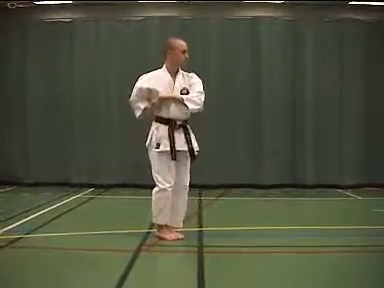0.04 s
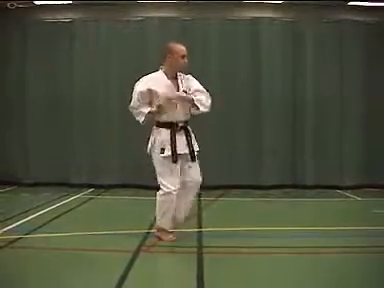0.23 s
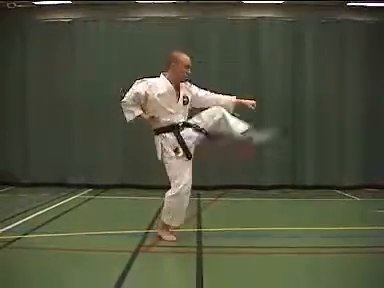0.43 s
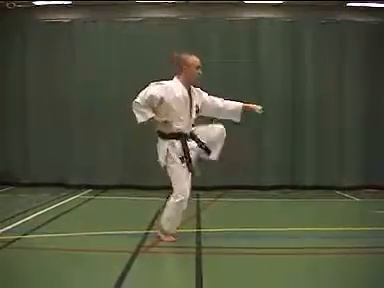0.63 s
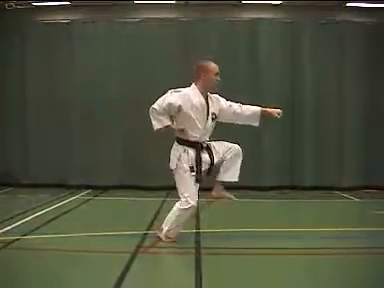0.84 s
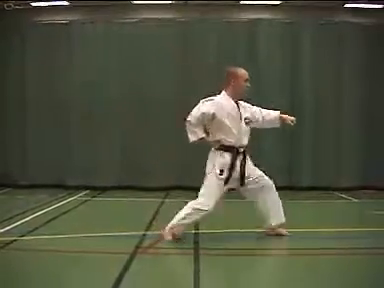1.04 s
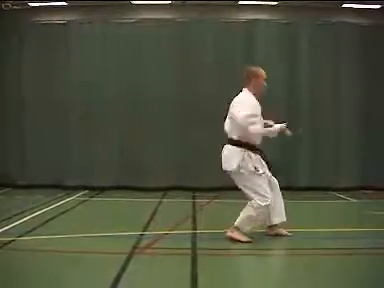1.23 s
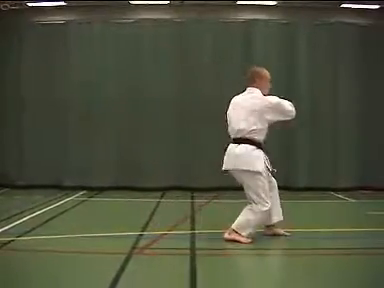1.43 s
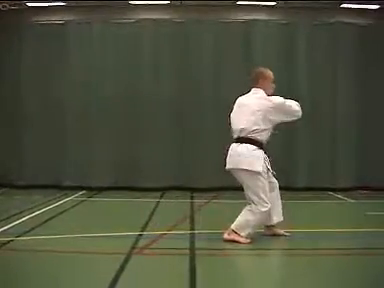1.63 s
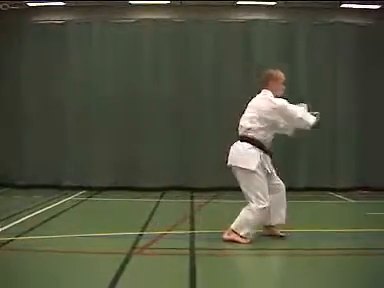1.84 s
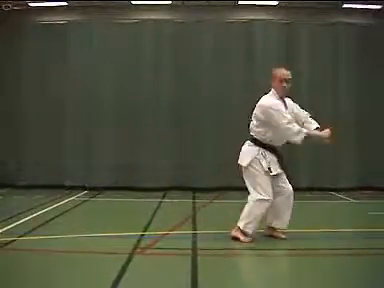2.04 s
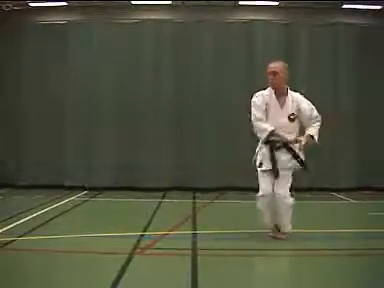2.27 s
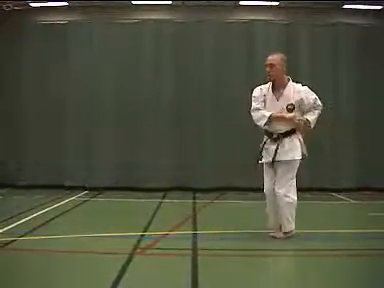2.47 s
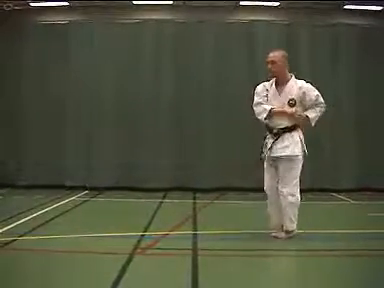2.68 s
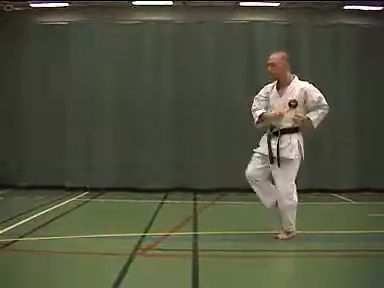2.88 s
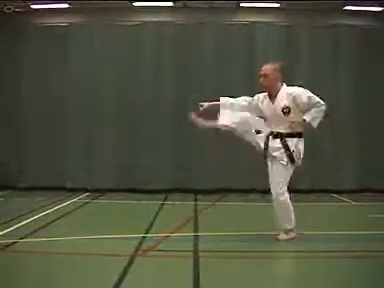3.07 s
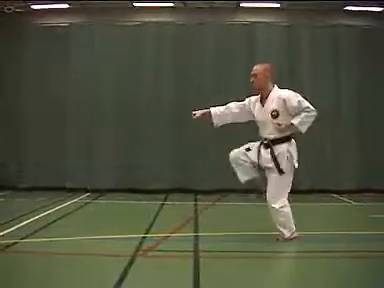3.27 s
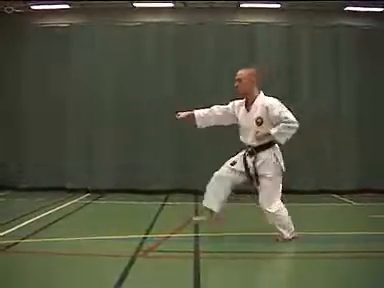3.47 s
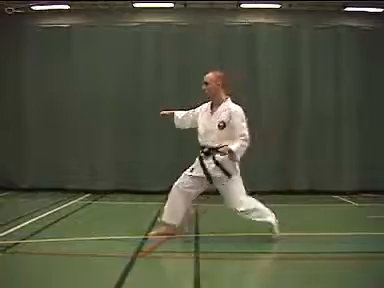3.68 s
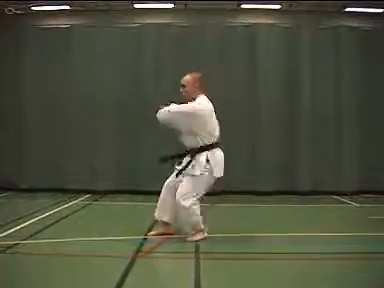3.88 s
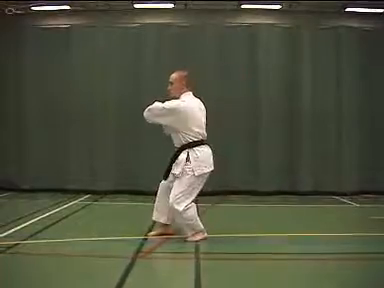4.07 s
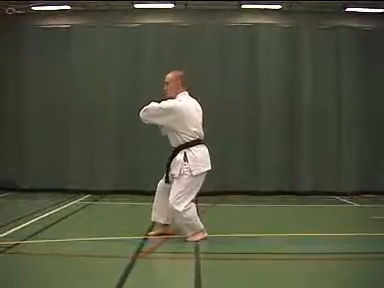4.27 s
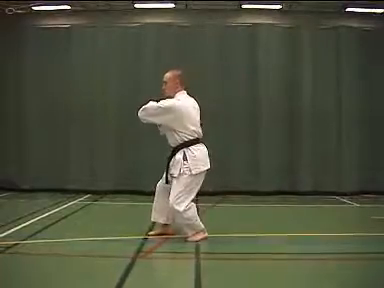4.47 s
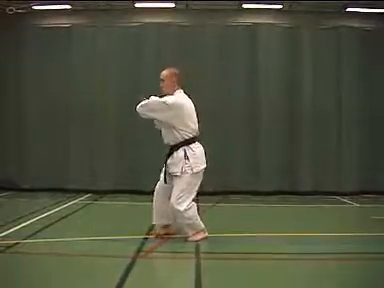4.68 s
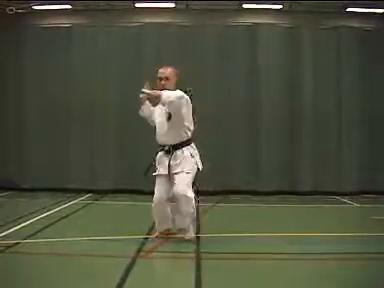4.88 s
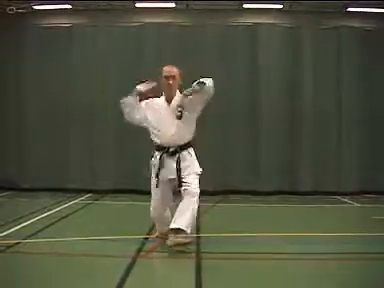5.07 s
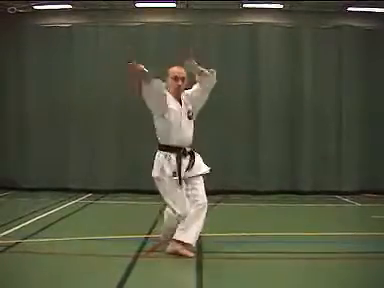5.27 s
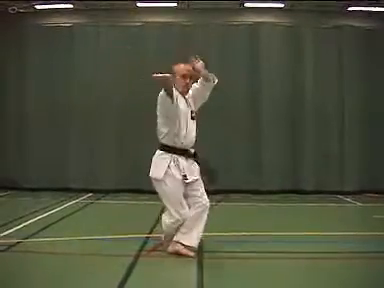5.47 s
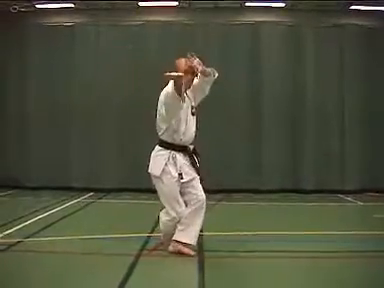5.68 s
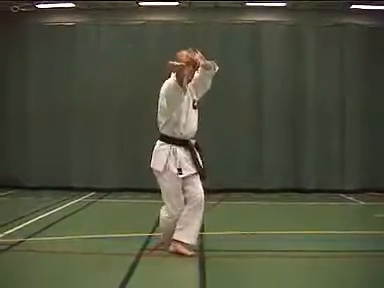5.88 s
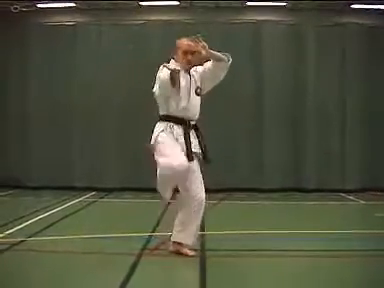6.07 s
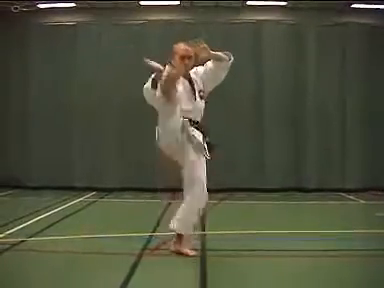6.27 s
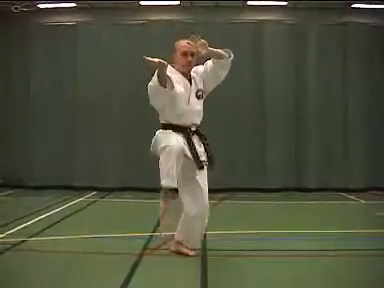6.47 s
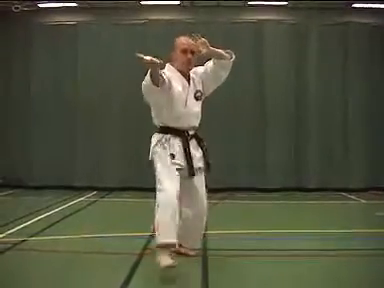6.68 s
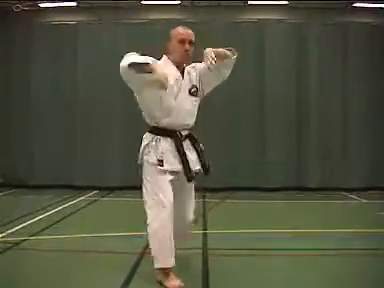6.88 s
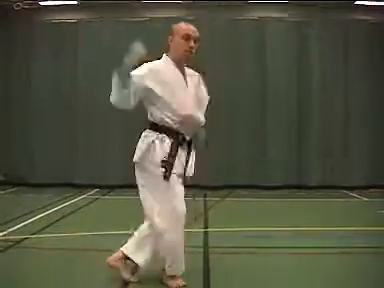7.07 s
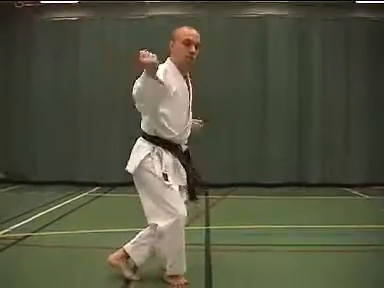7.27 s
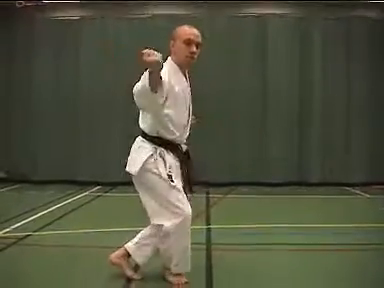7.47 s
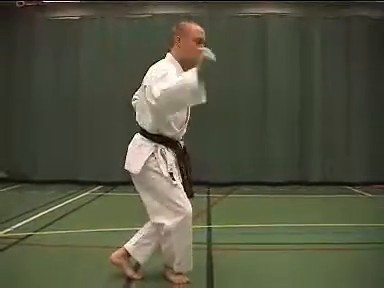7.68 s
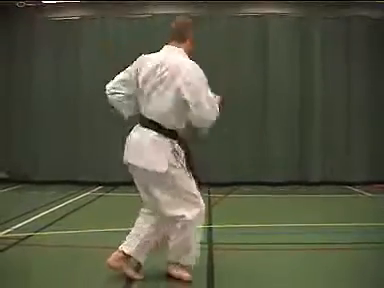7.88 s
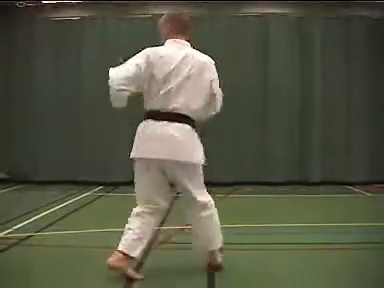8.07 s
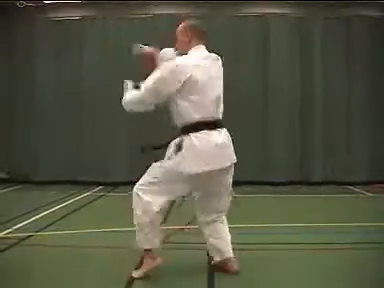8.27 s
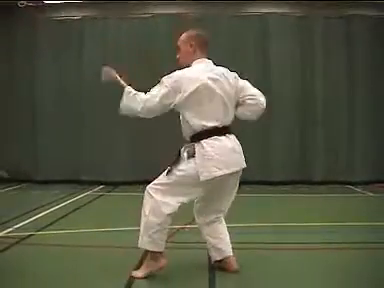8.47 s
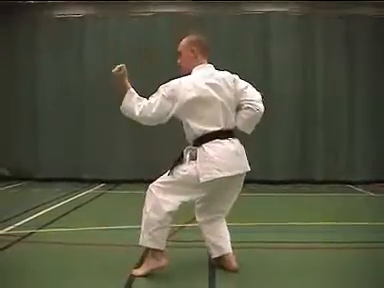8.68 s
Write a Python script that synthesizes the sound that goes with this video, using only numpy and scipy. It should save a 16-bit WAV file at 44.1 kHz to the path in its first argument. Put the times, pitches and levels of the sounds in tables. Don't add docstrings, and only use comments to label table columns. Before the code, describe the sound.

A barefoot martial artist moves through a form in a large sports hall. A cloth snap is followed by two hard foot slaps with deep thumps, then a quiet pause. More stamps and snapping sleeves come in uneven bursts, with rustling cotton and sliding soles. The distant microphone catches a long, boomy reverberation over ventilation rumble and a thin mechanical whine.

```python
import sys
import numpy as np
from scipy import signal
from scipy.fft import rfft, irfft, next_fast_len
from scipy.io import wavfile
from scipy.ndimage import uniform_filter1d

SR = 44100
rng = np.random.default_rng(int(sys.argv[2]) if len(sys.argv) > 2 else 0)


def persist_wave(psi):
    counts = np.round(np.clip(psi, -1, 1) * 32767).astype(np.int16)
    wavfile.write(sys.argv[1], SR, np.atleast_2d(counts).T)


N = 384552

# [f/Hz, level/dB]
FIBRE_FIZZ = [(1000, 14), (2500, 8), (4500, 2.5), (9000, -5), (16000, -12.5)]


def gain_of(db):
    return 10 ** (np.asarray(db) / 20)


def evened(x):
    return x / np.sqrt(np.mean(x ** 2) + 1e-20)


def read(points, hz):
    f, value = np.transpose(points)
    return np.interp(np.log(hz + 1), np.log(f + 1), value)


def add(mix, start_s, sound):
    part = mix[round(start_s * SR):][:len(sound)]
    part += sound[:len(part)]


def coloured(x, points):
    fft_size = next_fast_len(len(x))
    gain = gain_of(read(points, np.fft.rfftfreq(fft_size, 1 / SR)))
    return irfft(rfft(x, fft_size) * gain, fft_size)[:len(x)]


def resonate(x, hz, width_hz):
    return signal.lfilter(*signal.iirpeak(min(hz, SR / 3), hz / width_hz, SR), x)


def crack(noise, peak_db, body_hz, treble_db, length_ms, fizz=FIBRE_FIZZ):
    t = np.arange(len(noise)) / SR
    swell = (t * 1000 / max(length_ms, 0.3)) ** 2 * np.exp(-4000 * t / max(length_ms, 0.3))
    pocket = swell * (noise + 1.06 * np.cos(2 * np.pi * body_hz * t))
    click = signal.unit_impulse(len(noise), 100)

    def voiced(body, fibres):
        ring = resonate(resonate(body, body_hz, 2.02 * body_hz), body_hz, 2.8 * body_hz)
        return evened(ring) + gain_of(treble_db) * evened(coloured(fibres, fizz))

    near, far = voiced(pocket, swell * noise), voiced(click, click)
    scale = gain_of(peak_db) / abs(near).max()
    return scale * near, scale * far


def slaps():
    # [t/s, peak/dB, extra treble/(dB/octave), length/ms, hall share/dB]
    sleeve_slaps = [
        (0.5946, -3, -4.5, 2.63, -3),
        (6.4725, -7.5, 1, 9.4, -3.5),
        (7.1112, -3.5, 0, 5, -4),
    ]
    skin_slaps = [
        (1.1225, -3, 1, 5.6, 8.1),
        (1.4344, -1, 0.3, 7.5, 2.5),
    ]
    skid_slaps = [
        (3.7612, -10, -1, 5.5, 5.7),
        (5.256, -11.5, 0.5, 3.2, 5.6),
    ]
    # [f/Hz, density/(dB/Hz)]
    sleeve_colour = [(180, -30), (350, -12), (750, -0.5), (1300, -6.5), (2100, -13), (4650, -21.5),
                     (15500, -39)]
    skin_colour = [(180, -49), (450, -3.5), (800, -4.5), (1180, -1), (2100, -8), (3200, -15), (4600, -16),
                   (15500, -36.5)]
    skid_colour = [(260, -34), (520, -1), (750, -9), (1400, 1), (2800, -12.5), (4000, -21), (7500, -18),
                   (15500, -29)]
    # events, (body Hz, broad noise over body tone dB), colour
    kinds = [(sleeve_slaps, (1029, 6.2), sleeve_colour),
             (skin_slaps, (1350, 5.5), skin_colour),
             (skid_slaps, (1435, 1.2), skid_colour)]
    near, far = np.zeros((2, N))
    click = signal.unit_impulse(2048, 100)

    def tilted(colour, db_per_octave):
        return [(f, db + db_per_octave * np.log2(max(f / 1000, 1))) for f, db in colour]

    for events, (body_hz, noise_db), colour in kinds:
        for start_s, peak_db, tilt_db, length_ms, hall_db in events:
            noise = rng.standard_normal(2048)
            brighter = tilted(colour, tilt_db + 0.86)
            direct, spread = crack(noise, peak_db, body_hz, noise_db, length_ms, brighter)
            add(near, start_s, direct)
            hall_sound = evened(coloured(click, tilted(colour, tilt_db)))
            add(far, start_s, gain_of(hall_db) * spread.std() * hall_sound)
    return near, far


def fold_cracks():
    # [t/s, peak/dB, body f/Hz, hall share/dB]
    loose_folds = [(0.326, -31, 990, 5), (0.57, -19.5, 900, 6.5), (0.614, -19, 1000, -23),
                   (2.921, -35.5, 1930, 4), (3.22, -22.5, 578, 7), (4.072, -25.5, 670, 21.5),
                   (6.317, -26, 1910, -4), (8.369, -25, 570, -7), (8.472, -11.5, 614, -0.5),
                   (8.488, -15, 620, -3), (8.603, -21.5, 735, -16)]
    firm_folds = [(0.426, -29, 1310, -8), (0.467, -27, 800, -4), (0.553, -24, 870, 8.5),
                  (0.72, -21, 1080, 1), (3.036, -21, 1030, -19), (3.069, -26, 970, 2), (3.113, -27, 960, 1),
                  (3.138, -16.5, 626, 3), (3.325, -26, 1900, 1), (3.953, -16, 583, 3),
                  (4.926, -51, 646, -1), (5.381, -7.5, 650, 3), (6.337, -18, 1090, -7),
                  (6.423, -18, 680, 4), (7.197, -6.5, 696, -21), (8.432, -13.5, 670, 9.5)]
    taut_folds = [(6.331, -24.5, 700, 9.5), (3.156, -21, 716, -28), (3.944, -14.5, 1260, 2),
                  (3.984, -10, 586, 12.5), (4.624, -36.5, 751, 5.5), (5.242, -25, 1850, 1),
                  (6.051, -41, 617, 11), (6.995, -31, 605, -6), (6.905, -34, 2210, -10),
                  (7.071, -30.5, 590, 16.5), (7.098, -10, 564, 0.), (7.169, -4.5, 692, -1),
                  (7.175, -2, 626, -13), (7.302, -11.5, 716, -5), (8.205, -32, 5080, -1)]
    # events, treble dB, length ms
    kinds = [(loose_folds, -11, 5), (firm_folds, -7.5, 2.02), (taut_folds, 0.5, 7.3)]
    near, far = np.zeros((2, N))
    for events, treble_db, length_ms in kinds:
        for start_s, peak_db, body_hz, hall_db in events:
            direct, spread = crack(rng.standard_normal(2048), peak_db, body_hz, treble_db, length_ms)
            add(near, start_s, direct)
            add(far, start_s, gain_of(hall_db) * spread)
    return near, far


def thump(peak_db, hz, t60_s, sharp):
    t = np.arange(-400, SR // 2) / SR
    late = np.maximum(t, 0)
    glide = hz * (late + 0.0074 * (1 - np.exp(-late / 0.0059)))
    turns = np.where(t > 0, glide, 2.6 * hz * t)
    decay = (1 + late / 0.0061) * gain_of(-90 * late / t60_s)
    envelope = np.where(t > 0, decay, np.exp(-(t / 0.0017) ** 2))
    swing = 0.95 * envelope * np.cos(2 * np.pi * turns)
    dip = np.exp(-np.sqrt(t ** 2 + 0.00015 ** 2) / 0.0009)
    sharp = np.clip(sharp, 0, 1)
    return -gain_of(peak_db) * ((1 - sharp) * swing + sharp * dip)


def heel_thumps():
    # [t/s, peak/dB, board f/Hz, ring t60/s, hall share/dB]
    heels = [(0.577, -23.5, 65.6, 0.14, 3.5), (1.1136, 0, 72, 0.065, -1), (1.4171, -8.5, 92, 0.073, -5),
             (3.725, -0.5, 71.5, 0.067, -4.5), (3.951, -5.5, 90, 0.07, 0.5),
             (5.2503, -2.5, 69.6, 0.066, -6), (5.382, -8, 89, 0.062, -6), (6.491, -36.5, 56, 0.2, -3),
             (6.879, -14.5, 69, .125, -9), (7.126, -4, 72, 0.076, -5.5), (7.398, -26.5, 75.4, .13, -4),
             (8.3, -38, 60.7, .25, 3.5), (8.485, -31, 70, .11, -18)]
    # [f/Hz, level/dB]
    boom_colour = [(25, -7), (60, -1), (110, 4.5), (170, -1.5), (260, -2.5), (600, -20), (1500, -13),
                   (4000, -75)]
    # [f/Hz, width/Hz, level/dB]
    slab_modes = [(72, 6.5, 11), (100, 17, 5), (133.3, 3.9, 1), (150.8, 1.96, 17.5), (170.6, 0.82, -2.5)]
    stiff_s, soft_share = 0.052, 0.16
    lead_s = 400 / SR
    near, slab = np.zeros((2, N))
    boom = evened(coloured(signal.unit_impulse(4096, 400), boom_colour))
    for hit_s, peak_db, board_hz, t60_s, hall_db in heels:
        add(near, hit_s - lead_s, thump(peak_db, board_hz, t60_s, stiff_s / t60_s - soft_share))
        add(slab, hit_s - lead_s, gain_of(peak_db + hall_db - 18.5) * boom)
    for mode_hz, width_hz, mode_db in slab_modes:
        near += gain_of(mode_db) * resonate(slab, mode_hz, width_hz)
    return near, slab


def rustle():
    # [fastest t/s, level/dB, 20 dB rise/s, 20 dB fall/s, treble/dB]
    moves = [(0.1, -56, 5, -2.5, -12), (0.324, -49.5, 0.14, 0.1, 7.5), (0.502, -37.5, 0.18, .05, -0.5),
             (0.595, -40, 0.2, -0.34, 0.5), (0.74, -47.5, 0.47, -0.37, 4), (1.84, -56, -3, 0, -26),
             (2.092, -62.5, .03, 0.5, 7), (2.292, -53.5, 0.5, 0.44, 5.5), (2.746, -58, 2, -3, 3.5),
             (2.968, -41.5, 0.02, -0.04, 2), (3.045, -40, .03, -0.25, -1), (3.156, -37, 0.29, 0.36, -3.5),
             (3.356, -48, .2, -0.26, 3.5), (4.6, -44, .06, -0.15, -8), (4.91, -46.5, 2, 0.4, -6),
             (5.236, -48.5, 0.16, 0.85, 5), (6.116, -46.5, 0.24, 0.47, 5), (6.33, -37, 0.08, -0.03, 0.5),
             (6.48, -40.5, -0.4, 0.14, -4), (7.087, -43.5, 0.25, -0.2, -1), (7.93, -53, 0.6, .4, 6.5),
             (8.24, -52.5, 0.3, 0.5, 7), (8.326, -45.5, .04, 0, 1.5), (8.443, -37.5, 0.07, 0.2, 7.5)]
    # [f/Hz, density/(dB/Hz)]
    cloth_colour = [(71, -25), (120, -3.5), (327, -1), (592, -2), (988, -9), (4200, -23), (11300, -30),
                    (16000, -38)]
    t = np.arange(N) / SR
    coarse_t = np.arange(0, N + 64, 32) / SR
    peak_s, level_db, rise_s, fall_s, treble_db = np.transpose(moves)[:, :, None]
    away = np.maximum((peak_s - coarse_t) / abs(rise_s), (coarse_t - peak_s) / abs(fall_s))
    swells = gain_of(level_db + 3 - 20 * away)
    dull = np.interp(t, coarse_t, np.linalg.norm(swells, axis=0))
    bright = np.interp(t, coarse_t, np.linalg.norm(swells * gain_of(treble_db), axis=0))

    hiss, clumps, chance, strength = rng.standard_normal((4, N))
    clumps = gain_of(2.1 * evened(uniform_filter1d(uniform_filter1d(clumps, 300), 300)))
    ticks = 3.0 * strength * (chance > 2.6)
    fibres = evened(coloured(evened(hiss * clumps) + ticks, cloth_colour))
    pops = strength * (chance < -2.8)
    for width_hz in (500, 500, 700):
        pops = resonate(pops, 750, width_hz)
    low = signal.sosfilt(signal.butter(2, 1800, fs=SR, output="sos"), fibres)
    return dull * (low + gain_of(-10.5) * evened(pops)) + bright * (fibres - low)


def flap():
    # [f/Hz, density/(dB/Hz)]
    flap_colour = [(88, -66), (150, -16.5), (190, 3.5), (649, 5.5), (1560, -19.5), (3100, -17),
                   (11300, -48), (16000, -64)]
    start_s, length_s, peak_db = 3.989, 0.16, -14.5
    rise_db_per_s, fall_db_per_s = 2500, 106
    rush, lumps = rng.standard_normal((2, N))
    late_s = np.arange(N) / SR - start_s
    level_db = peak_db - np.maximum(-rise_db_per_s * late_s, fall_db_per_s * late_s)
    lumps_db = 1.5 * evened(uniform_filter1d(lumps, 200))
    return (late_s < length_s) * gain_of(level_db + lumps_db) * evened(coloured(rush, flap_colour))


def swish():
    # [t/s, level/dB, half length/s]
    swings = [
        (0.32, -62, .01),
        (0.5, -53, 0.037),
        (2.083, -55.5, .002),
        (2.092, -50, .003),
        (2.28, -55, 0.049),
        (2.4, -64, .08),
        (5.926, -60, 0.052),
        (6.99, -57, 0.076),
        (7.98, -58, .04),
        (8.248, -60, 0.073),
    ]
    # [f/Hz, density/(dB/Hz)]
    swish_colour = [(3000, -30), (6000, -3), (9000, 0), (14000, -2), (17000, -15)]
    t, speed = np.arange(N) / SR, np.zeros(N)
    for peak_s, level_db, half_s in swings:
        speed += gain_of(level_db) * np.exp(-((t - peak_s) / half_s) ** 2)
    return speed * evened(coloured(rng.standard_normal(N), swish_colour))


def touches():
    # [t/s, peak/dB, body f/Hz, treble/dB, length/ms]
    contacts = [(1.106, -21, 1306, -4.5, 10), (1.385, -36, 2500, -2, 2.0), (3.7165, -31, 2460, 5, 2.2),
                (3.733, -24.5, 1960, -10, 6.5), (5.2518, -8, 3020, 8, 3.2), (5.277, -24, 3160, -16, 7.8),
                (5.288, -21, 3010, -21, 4.8), (5.297, -28, 6760, -10, 3.0), (8.394, -25.5, 2900, -4., 39),
                (8.406, -32, 4400, -18, 50), (8.433, -13.5, 1620, -1, 2.5)]
    near = np.zeros(N)
    for start_s, *shape in contacts:
        add(near, start_s, crack(rng.standard_normal(2048), *shape)[0])
    return near


def slides():
    # [start t/s, length/s, level/dB, body f/Hz]
    drags = [
        (1.201, 0.22, -27, 1120),
        (1.46, 0.11, -28, 1150),
        (3.793, .14, -36, 1800),
        (5.274, 0.12, -37.5, 2920),
        (8.397, 0.07, -35.5, 3570),
    ]
    slips_per_s, hiss_db = 650, -9
    out = np.zeros(N)
    for start_s, length_s, level_db, body_hz in drags:
        strength, chance = rng.random((2, SR // 2))
        progress = np.clip(np.arange(SR // 2) / SR / length_s, 0, 1)
        stroke = np.sin(np.pi * progress) ** 0.5
        slips = (strength - 0.5) * (0.12 + (chance < slips_per_s / SR))
        body = evened(resonate(resonate(slips, body_hz, 0.53 * body_hz), body_hz, 0.8 * body_hz))
        hiss = gain_of(hiss_db) * evened(coloured(slips, FIBRE_FIZZ))
        add(out, start_s, gain_of(level_db) * stroke * (body + hiss))
    return out


def squeaks():
    # [t/s, level/dB, pitch f/Hz, length/ms]
    chirps = [
        (2.722, -44, 1410, 42),
        (2.73, -46, 1870, 27),
        (6.1, -45, 3180, 22),
        (8.155, -42, 1510, 24),
        (8.155, -50, 2170, 35),
        (8.17, -41, 1914, 14),
    ]
    out = np.zeros(N)
    for start_s, level_db, pitch_hz, length_ms in chirps:
        t = np.arange(round(length_ms * SR / 1000)) / SR
        tone = np.sin(2 * np.pi * pitch_hz * t * (1 + 0.7 * t))
        add(out, start_s, gain_of(level_db) * np.hanning(len(t)) * tone)
    return out


def hall():
    # [f/Hz, t60/s]
    decay = [(50, 1.3), (140, 3.56), (400, 2.18), (1100, 1.36), (2900, 1.194), (6500, 0.79), (11000, 0.53),
             (15000, 0.35)]
    # [delay/ms, level over tail/dB]
    echo_list = [
        (19, 18.5),
        (23, -3),
        (33, -11),
        (43, -15),
        (51, -21),
        (64, -34),
    ]
    length = 3 * SR
    hz, t, bins = signal.stft(rng.standard_normal(length), SR, nperseg=512)
    fade = gain_of(-60 * t / read(decay, hz)[:, None])
    tail = signal.istft(bins * fade, SR, nperseg=512)[1][:length]
    t_ms = np.arange(length) / SR * 1000
    echoes = sum(gain_of(db) * np.exp(-((t_ms - delay_ms) / 2.6) ** 2) for delay_ms, db in echo_list)
    dense = np.clip((t_ms - 17) / 12, 0, 1) * (1 + 0.43 * np.exp(-t_ms / 90))
    tail *= 0.23 * echoes + dense
    return tail * gain_of(-41) / tail[4000:6000].std()


def air():
    # [f/Hz, density/(dB/Hz)]
    air_colour = [(15, -58), (25, -11), (70, 1.5), (180, -4), (600, -13.5), (1550, -17), (11600, -34),
                  (16000, -40.5)]
    # [f/Hz, width/Hz, level/dB]
    whine_bands = [
        (3470, 160, -69),
        (4420, 380, -64),
        (6450, 140, -69.5),
        (7600, 540, -81),
        (11360, 780, -73),
    ]
    wide, narrow = rng.standard_normal((2, N))
    out = gain_of(-47) * evened(coloured(wide, air_colour))
    for hz, width_hz, level_db in whine_bands:
        out += gain_of(level_db) * evened(resonate(resonate(narrow, hz, width_hz), hz, width_hz))
    return out


def scene():
    # [f/Hz, level/dB]
    wall_colour = [(50, -5), (150, -5.5), (500, -6), (1500, -8.5), (5000, -4), (15000, -4)]
    near, far = np.sum([slaps(), fold_cracks(), heel_thumps()], axis=0)
    cloth, rush, drag, chirps = rustle(), flap(), slides(), squeaks()
    near += touches() + chirps + cloth + rush + drag
    far += gain_of(-6) * chirps + cloth + gain_of(1.5) * rush + gain_of(-4) * drag
    reverb = signal.fftconvolve(coloured(far, wall_colour), hall())[:N]
    return (near + reverb + swish() + air())[None]


def low_pass(x):
    return signal.sosfilt(signal.butter(12, 16840, fs=SR, output="sos"), x)


def record(dry):
    thinned = signal.lfilter(*signal.butter(3, 44, "high", fs=SR), dry)
    limited = 0.82 * np.tanh(thinned / 0.97)
    band_edge = signal.firwin(255, 15900, fs=SR)
    return low_pass(signal.oaconvolve(limited, band_edge[None], "same"))


dry = scene()
out = record(dry)
persist_wave(out)
```